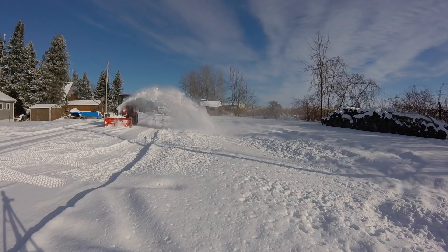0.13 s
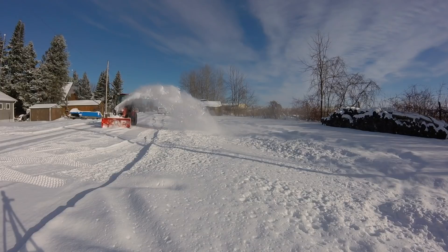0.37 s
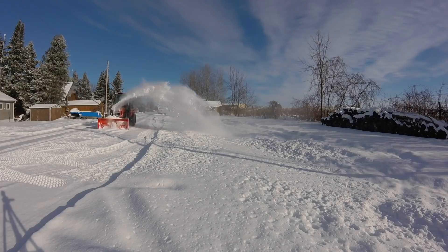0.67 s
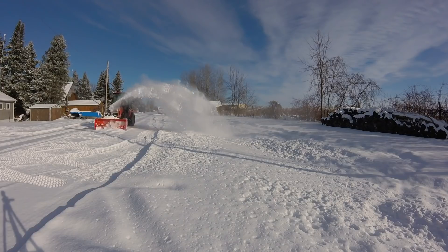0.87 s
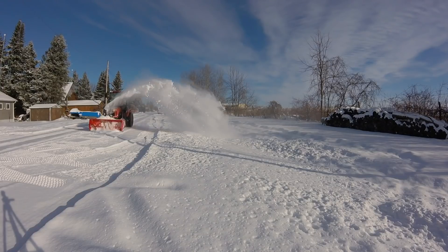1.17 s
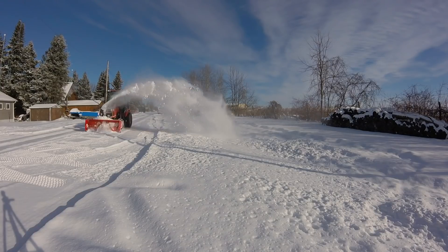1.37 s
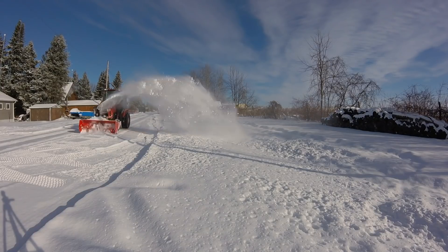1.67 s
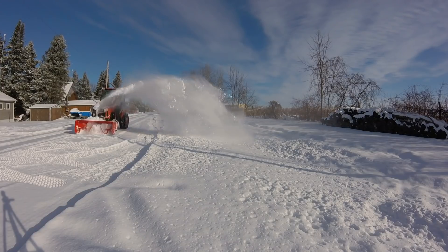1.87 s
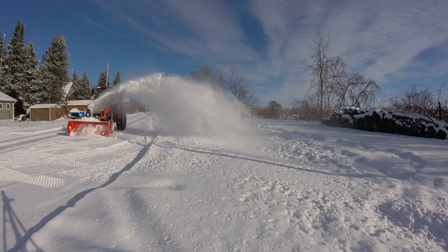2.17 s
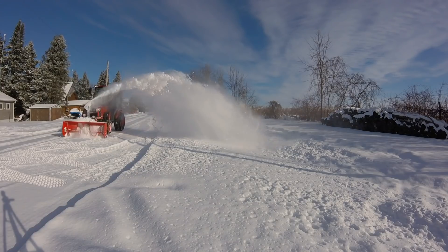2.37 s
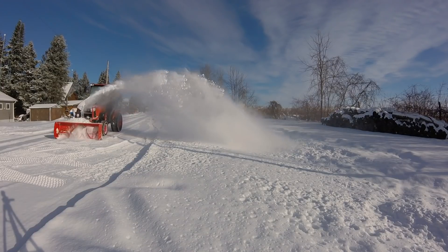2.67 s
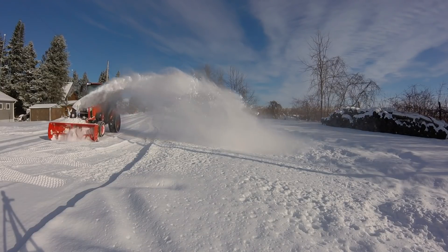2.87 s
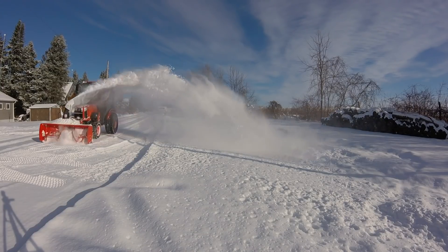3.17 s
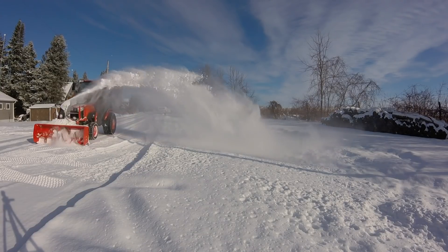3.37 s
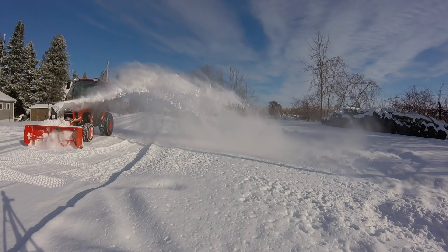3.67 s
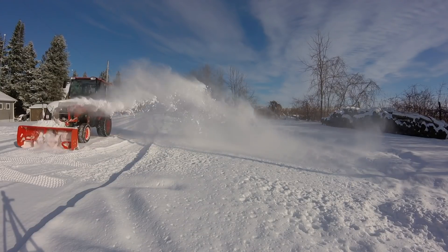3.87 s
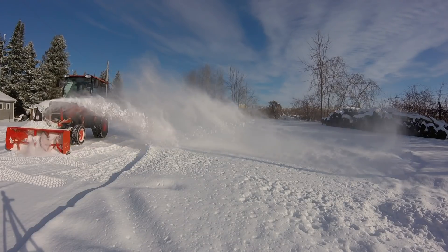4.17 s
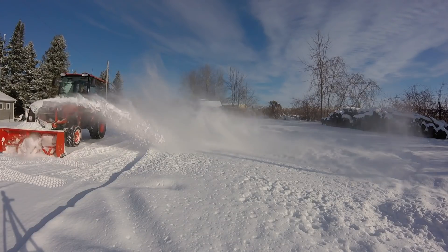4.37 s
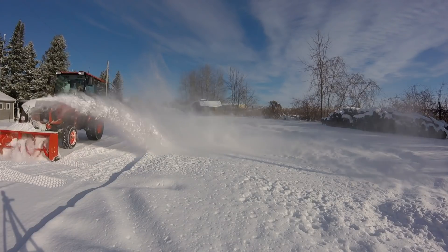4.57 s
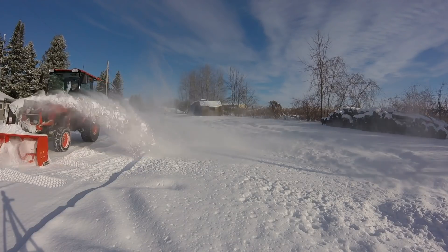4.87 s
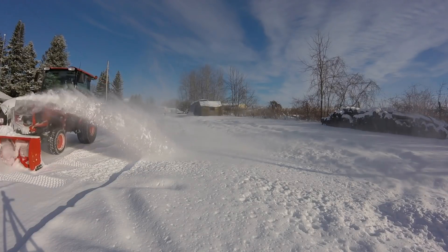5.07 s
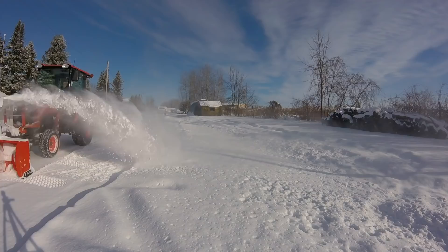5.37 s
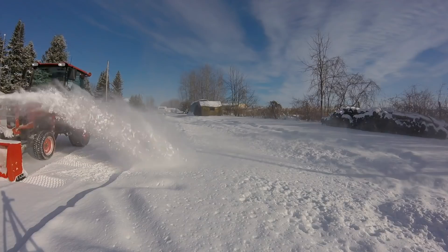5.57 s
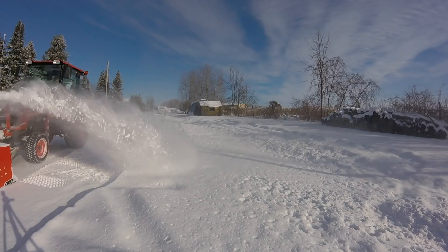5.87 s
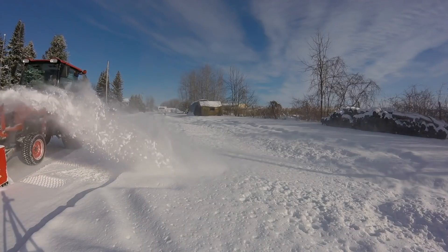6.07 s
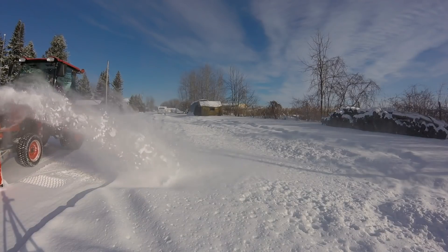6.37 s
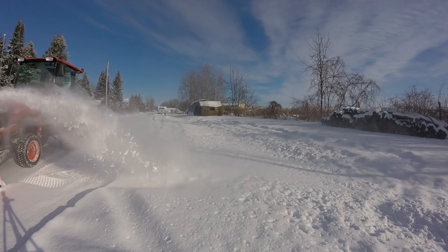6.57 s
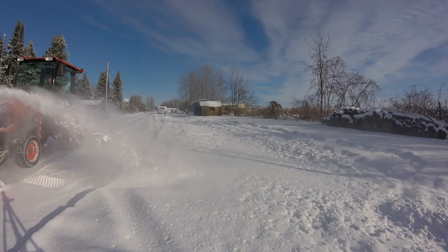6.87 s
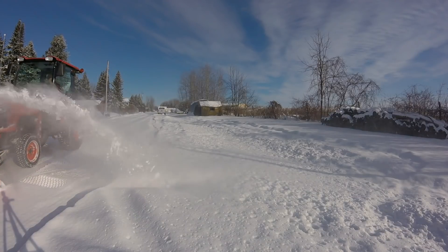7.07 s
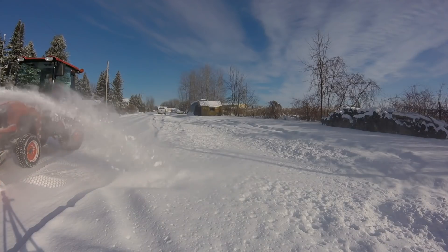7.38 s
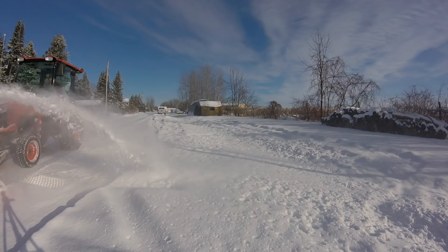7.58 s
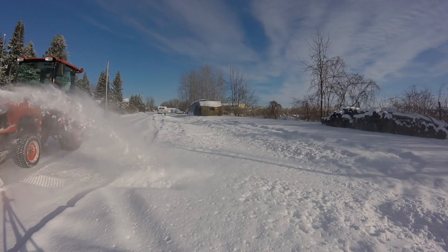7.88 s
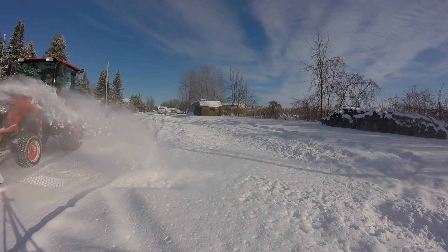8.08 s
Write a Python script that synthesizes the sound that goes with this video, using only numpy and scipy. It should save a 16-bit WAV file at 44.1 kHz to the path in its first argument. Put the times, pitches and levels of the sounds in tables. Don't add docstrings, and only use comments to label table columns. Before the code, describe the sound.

From 0 s a diesel tractor with a front snowblower is already running across a snowy open yard, some distance away. Its impeller blades slap snow about 47 times a second, a coarse buzzing flutter with a hollow metallic chute tone, above a low exhaust drone. Roar and hiss of flying snow pulse with the engine. At about 1.2 s a small stone gives one brief dull clink on steel. The speed sags slightly near 1.6, 2.5 and 3.6 s, then recovers. The sound swells steadily, brighter and denser from 4 to 6 s as the tractor comes alongside. Soft low wind gusts rumble, strongest around 6 and 7 s. Engine groan thickens near 7.5 s; from about 7.7 s the slaps ease slightly into wash, with another small sag near 7.9 s. It stays loud to the end, around 8.2 s. The fixed microphone in a hard case sounds boxy, with limited top treble.

```python
import sys
import numpy as np
from scipy import signal
from scipy.fft import rfft, irfft, next_fast_len
from scipy.io import wavfile
from scipy.ndimage import uniform_filter1d, map_coordinates

SR = 44100
rng = np.random.default_rng(int(sys.argv[2]) if len(sys.argv) > 2 else 0)


def boost(x):
    u = np.asarray(x, float) / 20
    return 10 ** u


def put_to_file(sound):
    columns = np.atleast_2d(sound).T
    safe = np.clip(columns, -1, 1)
    whole_steps = np.round(safe * 32767)
    wavfile.write(sys.argv[1], SR, whole_steps.astype(np.int16))


N = 363384


def unit(x):
    return x / np.sqrt(np.mean(x ** 2) + 1e-20)


def curves(rows):
    s, *cols = np.transpose(rows)
    return [np.interp(np.arange(N) / SR, s, c) for c in cols]


def wobble(rate):
    knots = rng.standard_normal(int(N * rate / SR) + 4)
    return unit(map_coordinates(knots, [np.arange(N) * rate / SR]))


def hump(s, length):
    return np.cos(np.pi * np.clip((np.arange(N) / SR - s) / length, -.5, .5)) ** 2


def ramp(s, length):
    return np.clip((np.arange(N) / SR - s) / length + .5, 0, 1)


def slope(points):
    f, db = np.transpose(points)
    return lambda hz: np.interp(np.log(hz + 1), np.log(f + 1), db)


def bumps(rows):
    return lambda hz: sum(db / (1 + ((hz - centre) / width) ** 2) for centre, width, db in rows)


def coloured(x, db_at):
    m = 2 * next_fast_len(N // 2 + 8192)
    cepstrum = irfft(np.log(boost(db_at(np.fft.rfftfreq(m, 1 / SR)))), m)
    cepstrum[1:m // 2] *= 2
    cepstrum[m // 2 + 1:] = 0
    return irfft(rfft(x, m) * np.exp(rfft(cepstrum)), m)[:N]


def noise(patchy_db):
    z = signal.stft(rng.standard_normal(N + 512), nperseg=512)[2]
    field = uniform_filter1d(rng.standard_normal(z.shape), size=6, axis=0)
    field = uniform_filter1d(field, size=10, axis=1)
    return unit(signal.istft(z * boost(patchy_db * unit(field)), nperseg=512)[1][:N])


def strokes(phase, jitter_ms, scatter_db):
    at = np.flatnonzero(np.diff(np.floor(phase)) > 0)
    chance = rng.standard_normal((len(at), 2))
    delay = np.round(chance[:, 0] * jitter_ms * SR / 1000).astype(int)
    at = np.clip(at + delay, 0, N - 1)
    return np.bincount(at, boost(scatter_db * chance[:, 1]), N)


def dying(x, t60):
    return signal.lfilter([1], [1, -boost(-60 / (t60 * SR))], x)


# t/s, blade rate f/Hz
RUNNING = [(0.0, 46.563), (1.2, 46.357), (2.0, 46.662), (3.2, 46.946), (4.3, 46.574), (5.3, 46.949),
           (7.5, 47.174), (8.24, 47.015)]
# middle t/s, length t/s, deepest sag of blade rate f/Hz
BITES = [
    (1.601, 0.431, 1.38),
    (2.464, 0.472, 1.272),
    (3.618, 0.705, 1.256),
    (7.935, 0.653, 1.025),
]
BLADE_HZ = 46.7


def driveline():
    speed = curves(RUNNING)[0] - sum(sag * hump(s, length) for s, length, sag in BITES)
    return .016 + np.cumsum(speed) / SR, speed - BLADE_HZ


def firing_cycle(passes):
    firings_per_blade = 1.22755
    return 2 * np.pi * (firings_per_blade * passes - .385) / 6


# t/s, nearness level/dB, chute mouth turned to the listener level/dB
APPROACH = [(0.0, -53, 2.5), (0.5, -52, 4), (1.25, -51, 3), (1.75, -49.5, 3), (2.5, -48, 1.5),
            (3.0, -46.5, 1.5), (3.75, -45.5, -0.5), (4.25, -43.5, -1), (4.75, -43.5, 0.1),
            (5.25, -42, -0.4), (6.0, -41.5, 1.5), (6.75, -41, 2), (7.05, -40.5, 1), (7.4, -40.5, 0.5),
            (7.8, -42, -0.5), (8.24, -40.5, -1.3)]
CLOSEST_DB = -41


def approach():
    return curves(APPROACH)


# f/Hz, spectral density level/dB per Hz
YARD_SPECTRUM = [(100, -31.5), (180, -2), (280, 1), (400, -18.5), (1500, -23.5), (2800, -18), (3300, -12),
                 (3850, -16), (4200, -37), (6000, -59)]


def yard():
    return boost(-56 + 1.4 * wobble(1.66)) * unit(coloured(noise(patchy_db=3.0), slope(YARD_SPECTRUM)))


# t/s, level/dB
WIND = [(0.0, -50), (0.75, -50.5), (1.05, -49), (2.0, -52.5), (2.3, -49.5), (3.5, -49), (4.4, -45.5),
        (5.4, -53), (5.95, -43.5), (6.6, -51), (7.0, -42), (7.35, -54), (7.75, -45), (8.24, -56)]
# f/Hz, spectral density level/dB per Hz
GUST_SPECTRUM = [(5, -7), (15, 8), (35, 4.5), (50, 4.5), (90, -43)]


def wind():
    gust = unit(coloured(noise(patchy_db=0.6), slope(GUST_SPECTRUM)))
    return boost(curves(WIND)[0] + 1.0) * gust


# f/Hz, spectral density level/dB per Hz
DRONE_SPECTRUM = [(30, -38), (60, 5.5), (100, 3.5), (150, -3.5), (220, -14), (400, -48.5)]
DRONE_DB, DRONE_GROWS = -46, 0.6
DRONE_DB_PER_HZ, DRONE_SWING_DB = 1.9, 1.6
FLANK_S, FLANK_LENGTH_S, FLANK_DB = 7.46, 1.47, 7.5


def drone():
    near_db = approach()[0] - CLOSEST_DB
    level_db = DRONE_DB + DRONE_GROWS * near_db - DRONE_DB_PER_HZ * driveline()[1]
    level_db = level_db + DRONE_SWING_DB * wobble(4.1) + FLANK_DB * hump(FLANK_S, FLANK_LENGTH_S)
    return boost(level_db - 1.5) * unit(coloured(noise(patchy_db=0.4), slope(DRONE_SPECTRUM)))


# t/s, peak level/dB, f/Hz, t60/s
STONE = [
    (1.1903, -22, 1370, 0.035),
]


def stone():
    out, t = np.zeros(N + SR), np.arange(SR // 4) / SR
    for s, db, hz, t60 in STONE:
        envelope = boost(db - 60 * t / t60) * (1 - np.exp(-t / 0.0036))
        out[round(s * SR):][:len(t)] += envelope * np.sin(2 * np.pi * hz * t)
    return 0.52 * out[:N]


# multiple of a sixth of the firing rate, level/dB
EXHAUST = [(2, -25), (3, -19), (4, -10), (5, -21), (6, 6.5), (7, -8), (8, -20), (9, -15), (12, -5),
           (18, -10.5)]
NOTE_DB, NOTE_GROWS = -44.5, 0.78
NOTE_DB_PER_HZ, NOTE_LUG_DB = 8, -8


def exhaust():
    passes, spare_hz = driveline()
    cycle = firing_cycle(passes)
    note_db = NOTE_DB + NOTE_GROWS * (approach()[0] - CLOSEST_DB)
    note_db = note_db + np.maximum(NOTE_DB_PER_HZ * spare_hz, NOTE_LUG_DB)
    note = 0
    for multiple, db in EXHAUST:
        weak = multiple != 6
        level = boost(db + weak * 1.3 * wobble(1.8))
        note = note + level * np.cos(multiple * cycle + weak * 1.2 * wobble(1.38))
    return np.sqrt(2) * boost(note_db - 7.0) * note


# f/Hz, spectral density level/dB per Hz
ROAR_SPECTRUM = [(800, -45.5), (1600, -2.5), (2400, 1), (3400, 6.5), (3900, 1.5), (4400, -8), (5200, -40),
                 (7000, -35.5)]
# f/Hz, spectral density level/dB per Hz
HISS_SPECTRUM = [(3000, -22), (4500, 0), (6500, 3), (7500, -7.5), (9000, -21.5), (11000, -13.5),
                 (12500, -25), (14000, -24)]
ROAR_DB, ROAR_GROWS, ROAR_HIDDEN = -44, 0.66, 0.77
HISS_DB, HISS_GROWS, HISS_LATE_DB_PER_S = -54.5, 0.68, 0.64


def plume():
    near_db, facing_db = approach()
    near_db = near_db - CLOSEST_DB
    roar_db = ROAR_DB + ROAR_GROWS * near_db - ROAR_HIDDEN * facing_db
    hiss_db = HISS_DB + HISS_GROWS * near_db + HISS_LATE_DB_PER_S * (np.arange(N) - N) / SR
    cycle = firing_cycle(driveline()[0])
    beat = np.cos(cycle + .3) + 0.7 * np.cos(2 * cycle + 0.19) + 0.78 * np.cos(3 * cycle + .5)
    surge = wobble(11)
    roar = boost(1.44 * beat + 0.22 * surge) * noise(patchy_db=1.0)
    hiss = boost(1.3 * beat + 0.1 * surge + 0.21 * wobble(30)) * noise(patchy_db=0.83)
    roar = boost(roar_db - 4.5) * unit(coloured(roar, slope(ROAR_SPECTRUM)))
    return roar + boost(hiss_db + 4.5) * unit(coloured(hiss, slope(HISS_SPECTRUM)))


PAST_S, PAST_LENGTH_S = 7.72, 0.36
PAST_DB, WASH_DB = -3.5, 1
# f/Hz, spectral density level/dB per Hz
BOOM_SPECTRUM = [(60, -36), (120, -3.5), (200, 1.5), (300, -2.5), (420, -0.5), (560, -3), (900, -6.5),
                 (1150, -6), (1500, -11.5), (3000, -55.5)]
# f/Hz, spectral density level/dB per Hz
CRACK_SPECTRUM = [(500, -42), (1000, -25.5), (1400, 8), (2000, 3), (3000, 5), (4500, -18.5), (8000, -57)]
# f/Hz, spectral density level/dB per Hz
RING_SPECTRUM = [(700, -34), (1400, -17), (1650, -3.5), (1850, -3.5), (2100, -13.5), (3000, -10),
                 (4500, -22), (8000, -62)]
RING_AIMED = 0.38


def slaps(phase):
    near_db, facing_db = approach()
    crack_db = near_db + facing_db
    past = ramp(PAST_S, PAST_LENGTH_S)
    slap = strokes(phase, jitter_ms=.1, scatter_db=1.1)
    spray = unit(dying(slap, t60=.014) * noise(patchy_db=1.1))
    boom = 0.38 * spray + 1.06 * noise(patchy_db=0.0)
    churn = 0.21 * spray + 1.22 * noise(patchy_db=1.0)
    ring = .88 * unit(slap) + .27 * spray
    ring_db = crack_db - 10.5 + RING_AIMED * facing_db + PAST_DB * past
    return (boost(near_db - 4 + WASH_DB * past) * unit(coloured(boom, slope(BOOM_SPECTRUM)))
            + boost(crack_db - 8.0 + WASH_DB * past) * unit(coloured(churn, slope(CRACK_SPECTRUM)))
            + boost(ring_db) * unit(coloured(ring, slope(RING_SPECTRUM))))


def pressure_pulse(suck_ms, push_ms, push, edge_ms):
    ms = np.arange(-400, 401) * 1000 / SR
    step = lambda at: .5 + .5 * np.tanh((ms - at) / edge_ms)
    return push * (step(0) - step(push_ms)) - np.exp(np.minimum(ms, 0) / suck_ms) * (1 - step(0))


EDGE_FADES, EDGE_HZ, THUD_HZ = 0.37, 550, 307
THUD_DB, THUD_LOST_DB, THUD_LOST_S = 2, -6, 5.3


def travelled(pulse, near_db):
    thud = signal.filtfilt(*signal.butter(2, THUD_HZ, fs=SR), pulse)
    edge = signal.filtfilt(*signal.butter(2, EDGE_HZ, "high", fs=SR), pulse)
    thud_gain = boost(THUD_DB + THUD_LOST_DB * ramp(THUD_LOST_S, 1.2))
    edge_gain = boost(EDGE_FADES * (near_db - CLOSEST_DB) + 0.9)
    return pulse + (thud_gain - 1) * thud + (edge_gain - 1) * edge


# f/Hz, width/Hz, level/dB
CHUTE_MODES = [(235, 7.7, 1.5), (291, 10.4, -1), (425, 35.4, 10), (490, 17, -6), (820, 28, 7.5),
               (976, 69, 8)]


def blade_pulses(phase):
    near_db = approach()[0]
    puff = strokes(phase, jitter_ms=.05, scatter_db=1.1)
    shape = pressure_pulse(suck_ms=.75, push_ms=1.7, push=.9, edge_ms=.13)
    pulse = coloured(signal.fftconvolve(puff, shape, "same"), bumps(CHUTE_MODES))
    echo = np.pad(uniform_filter1d(pulse, size=30), (round(0.00717 * SR), 0))[:N]
    pulse = pulse - 0.27 * echo
    throb = 0.13 * boost(1.4 * wobble(2.7)) * np.cos(4 * np.pi * (phase - .14))
    pulse = boost(PAST_DB * ramp(PAST_S, PAST_LENGTH_S)) * travelled(pulse, near_db)
    return boost(near_db + 6.5) * (pulse + throb)


def blower():
    phase = driveline()[0] + .085
    return blade_pulses(phase) + slaps(phase)


def scene():
    return (yard() + wind() + drone() + stone() + exhaust() + plume() + blower())[None]


CASE_HZ = [1290, 1460, 1750, 2080, 2300, 2800, 3080, 3720, 4800, 5230, 5440, 5850, 6220, 7550, 8420, 8950,
           9700, 10600, 11180, 11930, 12850]
# width/Hz, level/dB
CASE_SHAPE = [(42.3, 7), (24.4, -16), (139, 10), (66, -5), (51, -9), (234, 5), (57, -3), (83, -0.5),
              (190, -11), (90, -10), (80, 1), (153, -19.5), (130, 2.5), (114, -5.5), (110, -1), (80, 0),
              (250, -9), (400, -4), (120, -8.5), (160, -8.5), (110, -6)]
# f/Hz, width/Hz, level/dB
AHEAD = [(2130, 60, -3), (3530, 120, 2.5), (5870, 88, 5.5), (6580, 150, 2), (7350, 130, -2.5)]
# f/Hz, width/Hz, level/dB
BESIDE = [(3740, 56, -3.5), (4600, 260, 3.5), (5260, 140, 5.5)]
SWING_S, SWING_LENGTH_S = 4.7, 1.1


def hard_case(x):
    case = [(hz, *shape) for hz, shape in zip(CASE_HZ, CASE_SHAPE)]
    side = ramp(SWING_S, SWING_LENGTH_S)
    return (1 - side) * coloured(x, bumps(case + AHEAD)) + side * coloured(x, bumps(case + BESIDE))


# f/Hz, spectral density level/dB per Hz
SELF_NOISE = [(2000, -5.5), (5000, -4), (9000, -9), (13000, -20), (16000, -22)]


def microphone(x):
    heard = signal.lfilter(*signal.butter(1, 5, "high", fs=SR), x)
    return heard + boost(-71.0) * unit(coloured(rng.standard_normal(N), slope(SELF_NOISE)))


# f/Hz, level/dB against the mean treble
TREBLE_GATE = [(5000, -30), (7000, -1), (8300, -1), (9700, -4), (11500, -4), (12000, -2), (12600, -1), (12900, 9),
               (13500, 9)]


def gated(x):
    hz, _, z = signal.stft(x, SR, nperseg=2048)
    patch = uniform_filter1d(uniform_filter1d(np.abs(z) ** 2, size=4, axis=0), size=3, axis=1)
    treble = uniform_filter1d(patch[(hz > 8000) & (hz < 12000)].mean(0), size=30)
    bands = rng.standard_normal((len(hz) // 24 + 1, z.shape[1])).repeat(24, axis=0)[:len(hz)]
    offset_db = 2.5 * unit(uniform_filter1d(bands, size=5, axis=1))
    swing_db = 3.5 * unit(uniform_filter1d(rng.standard_normal(z.shape[1]), size=2))
    strain_db = 7 * np.log10(treble / np.median(treble)) - 1.5
    offset_db += (hz[:, None] > 11800) * (swing_db + strain_db)
    keep = patch > treble * boost(slope(TREBLE_GATE)(hz)[:, None] + offset_db) ** 2
    return signal.istft(z * keep, SR, nperseg=2048)[1][:N]


def band_limit(x):
    return signal.sosfilt(signal.butter(12, 13440, fs=SR, output="sos"), x)


def record(dry):
    heard = microphone(hard_case(dry[0]))
    mix = gated(heard)[None]
    return band_limit(mix)


dry = scene()
out = record(dry)
put_to_file(out)
```